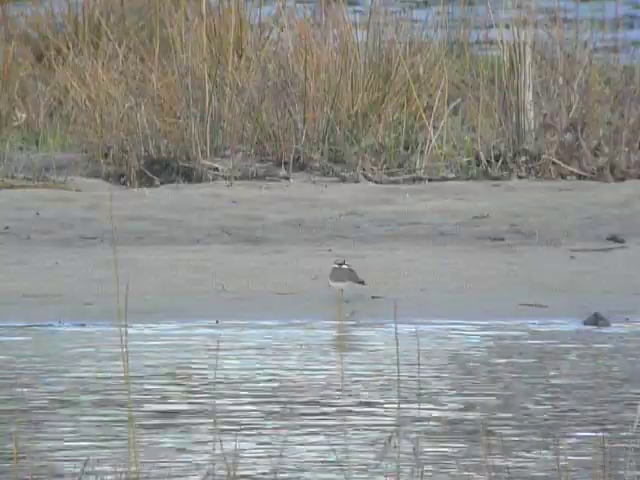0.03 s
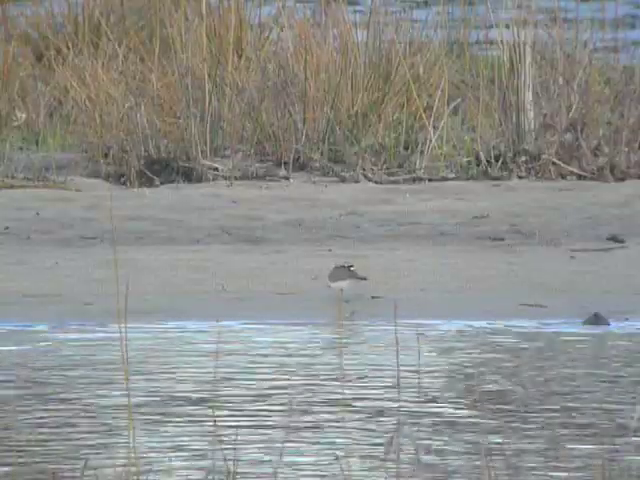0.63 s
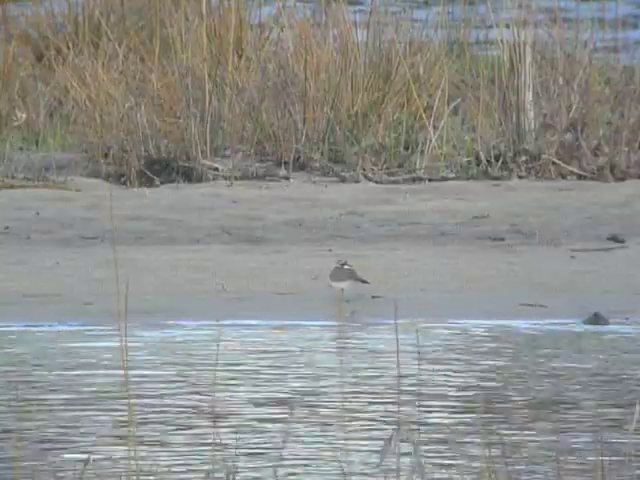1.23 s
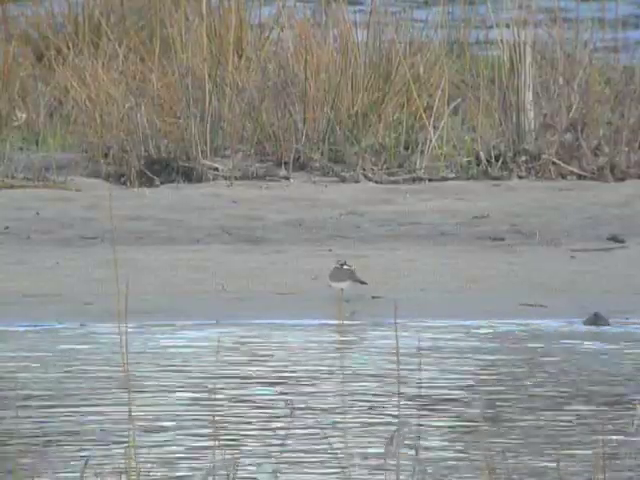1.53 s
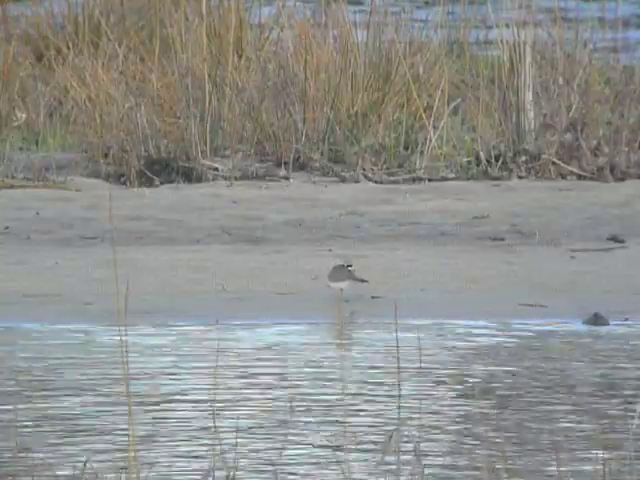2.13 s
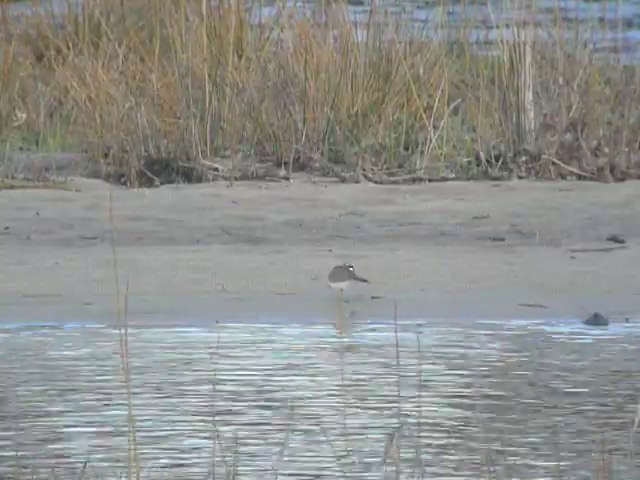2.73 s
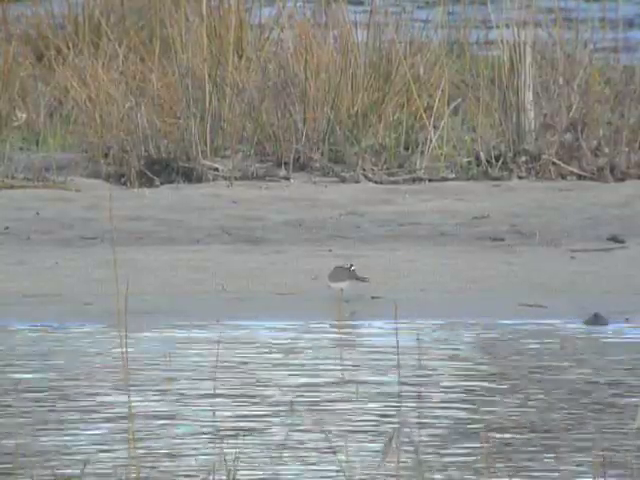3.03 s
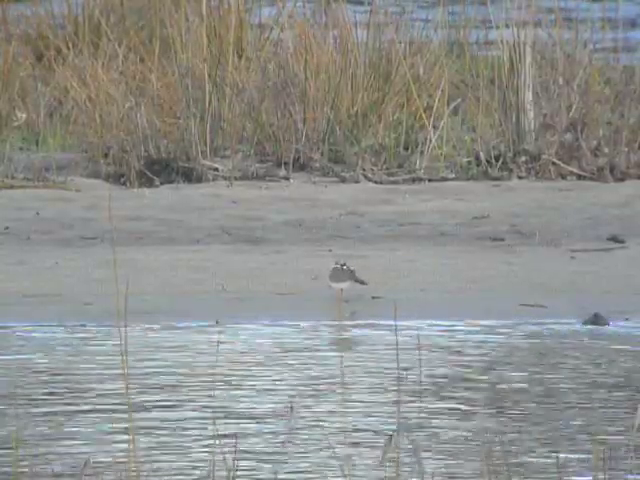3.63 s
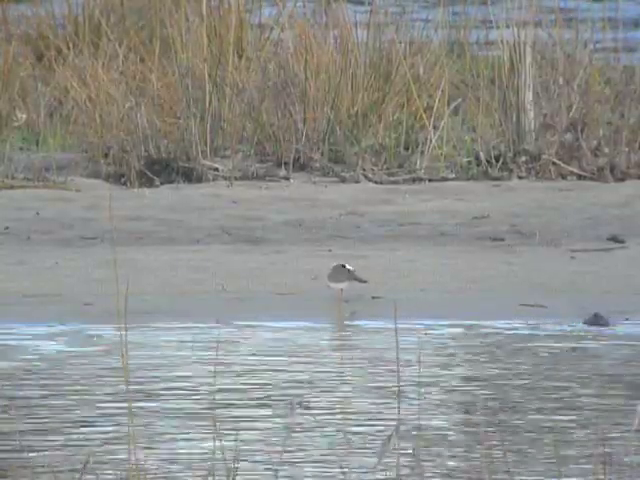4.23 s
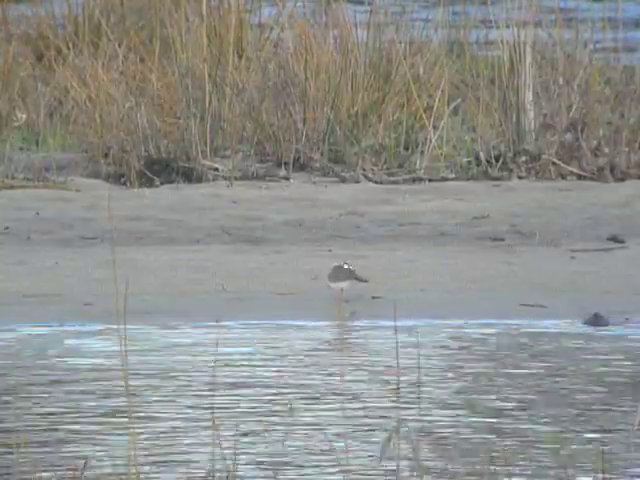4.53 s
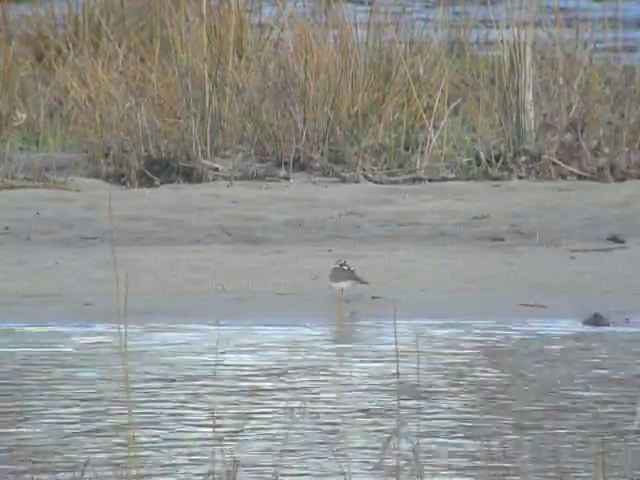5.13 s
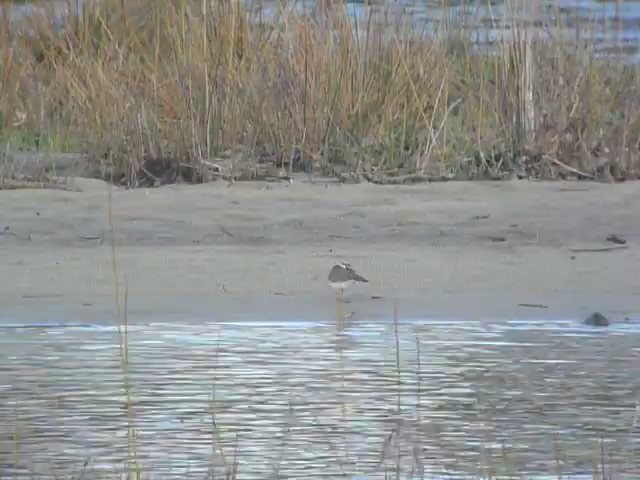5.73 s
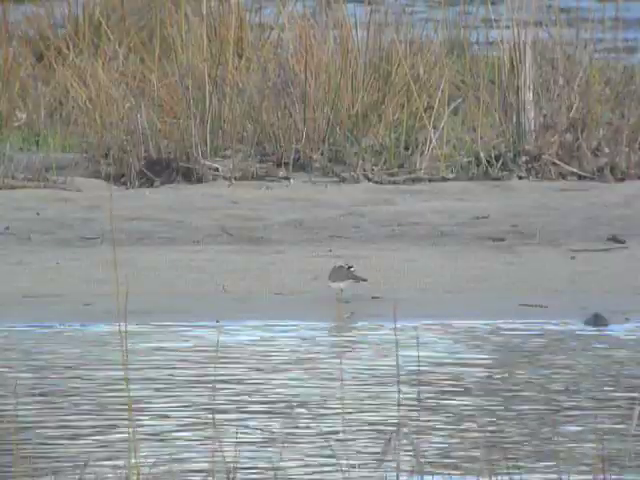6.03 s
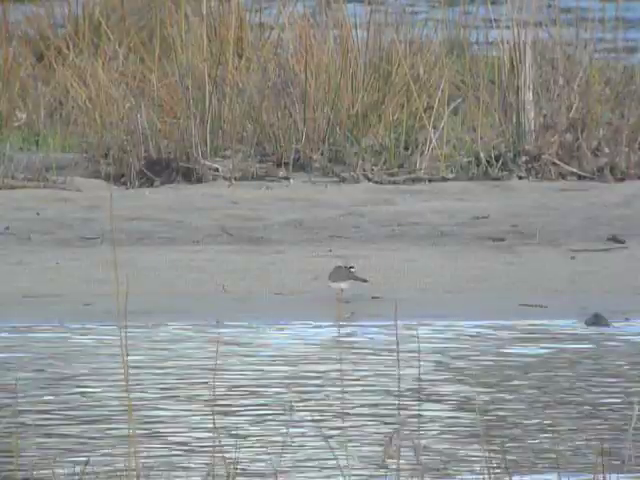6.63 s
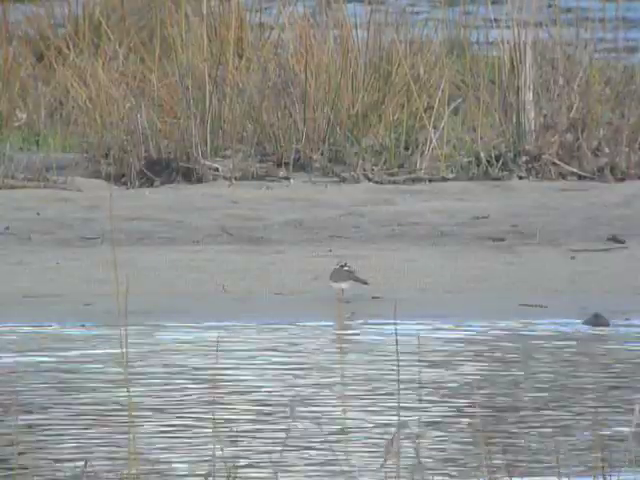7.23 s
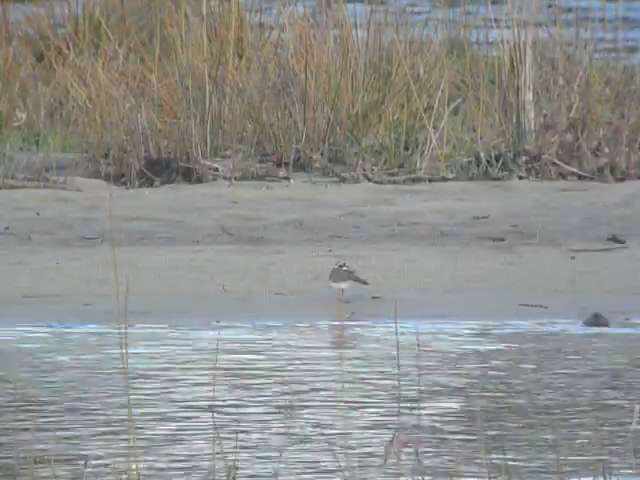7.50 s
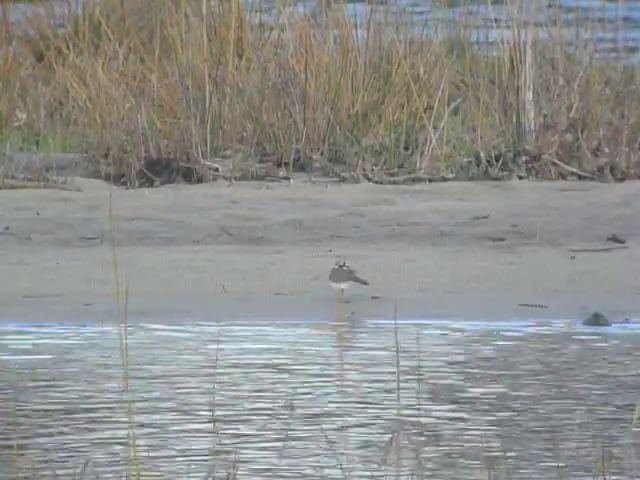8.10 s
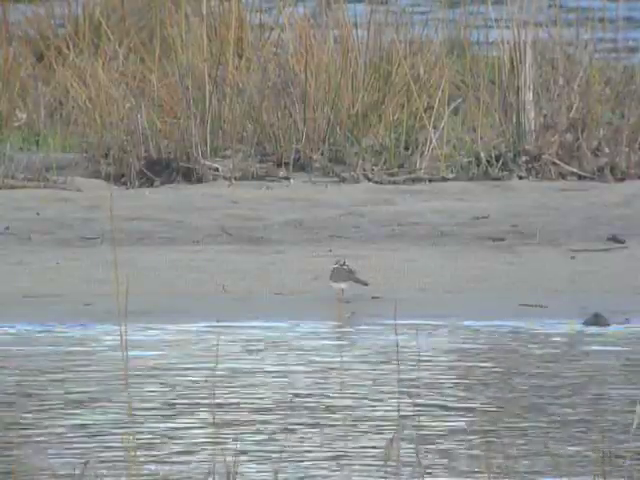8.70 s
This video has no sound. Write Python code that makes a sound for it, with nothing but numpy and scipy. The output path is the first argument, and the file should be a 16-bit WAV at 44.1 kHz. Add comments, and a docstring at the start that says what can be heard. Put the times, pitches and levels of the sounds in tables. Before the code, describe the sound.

A low outdoor rumble and the soft tyre roar of a distant road run for the whole nine seconds, swelling slightly as vehicles pass, with a faint microphone hiss. Close up, a light breeze thumps on the microphone, thickly for the first two seconds, then sparsely, with stronger bumps near 4, 7 and 7.7 seconds. One short, dull knock on the camera comes at about 0.9 seconds. Faint, distant songbirds whistle a held note with an upward slur at about 1, 5 and 6 seconds, with single whistles scattered between. Blurred twittering and quick runs of falling chips come from the reeds at around 3.2 to 4.3 seconds and again from 6 to 7.5. A faint, far engine hum holds its pitch until about 4 seconds, then sinks steadily lower to the end.

```python
"""Marshy riverbank in a light breeze

Tyres roar on a far road, where one engine holds its speed and then runs down. Distant songbirds
whistle slurred phrases, give short chips and twitter in the reeds. Up close, eddies of the breeze
thump on a narrow-band camera microphone, and the camera body takes one dull knock."""
import sys
import numpy as np
from scipy import signal
from scipy.fft import rfft, irfft
from scipy.io import wavfile
from scipy.ndimage import uniform_filter1d

SR = 44100
rng = np.random.default_rng(int(sys.argv[2]) if len(sys.argv) > 2 else 0)


def store_wav(level_fs):
    """Save 16-bit WAV to argv[1]."""
    pcm = np.round(np.clip(np.atleast_2d(level_fs), -1, 1) * 32767)
    wavfile.write(sys.argv[1], SR, pcm.T.astype(np.int16))


N = 386316
TIME = np.arange(N) / SR

# Tone colours of the open-air rumble and of the road's tyre roar, low body and hiss.
# Each row: frequency in Hz, relative spectral level in dB.
RUMBLE_SPECTRUM = [(20, -16.5), (40, -5), (65, 0.5), (100, -2), (160, -0.5), (250, -5.5), (340, -11.5),
                   (500, -11.5), (900, -41)]
ROAR_SPECTRUM = [(250, -13.5), (450, -17), (700, -9.5), (850, -4.5), (980, 0.5), (1070, 0), (1170, -3),
                 (1280, -2.5), (1450, -6.5), (1800, -8.5), (2100, -16.5), (2600, -30), (3500, -44.5)]
BODY_SPECTRUM = [(300, -20), (450, -11), (600, -2.5), (750, -0.5), (920, 0), (1300, -22)]
HISS_SPECTRUM = [(1300, -20.5), (1700, 2), (2050, 3.5), (2350, -1.5), (2650, -4), (3050, -5), (3400, -12),
                 (3800, -21.5), (4400, -33)]
# The rumble eases in the lull of the breeze. Each row: time in seconds, level in dB.
RUMBLE_FADER = [(0, -42.5), (1, -43.5), (3.2, -44.5), (5, -44.5), (6.5, -45), (8.76, -44.5)]
# Vehicles that stand out as they pass. Each row: time when nearest in seconds, seconds from there
# to half power, then the levels of roar, body and hiss in dB.
PASS_BYS = [(0.703, 0.46, -45.5, -50, -55), (2.212, 0.19, -40.5, -41.5, -59),
            (3.95, 0.92, -42.5, -56.5, -47.5), (7.396, 0.43, -63, -58, -48.5),
            (8.649, 0.38, -43, -44.5, -50)]
# The far engine's run. Each row: time in seconds, firing rate in Hz, level in dB.
ENGINE_RUN = [(0, 118, -56), (1.4, 118, -53), (1.9, 118, -46), (3, 127.5, -46), (3.9, 118, -49),
              (4.7, 93, -54), (5.5, 85, -56), (6.5, 72, -46.5), (8, 63.5, -47.5), (8.76, 57, -51)]
# Blurred twitter deep in the reeds. Each row: start in seconds, length in seconds, centre pitch in Hz,
# pitch spread as a share of the centre, relative level in dB.
TWITTER_SWELLS = [(0.12, 0.39, 3670, .06, -61.5), (3.197, 0.83, 3380, 0.082, -54.5),
                  (3.251, 1.1, 2120, 0.13, -42.5), (6.048, 0.73, 3560, 0.072, -57),
                  (6.251, .9, 2203, .09, -44.5), (7.151, 0.4, 2596, .14, -47)]
# Runs of falling chips. Each row: start in seconds, number of chips, spacing in seconds,
# each chip's starting pitch in Hz, relative level near the end of the run in dB.
CHIP_RUNS = [(3.39, 4, 0.084, 3730, -47), (5.997, 6, 0.1, 4120, -49.5), (6.68, 2, .22, 4320, -48.5)]
# One bird's phrase, a held note and then an upward slur. Each row: start in seconds,
# the held note's lowest pitch in Hz, relative levels of the held note and of the slur in dB.
SONG_PHRASES = [(.85, 2130, -45.5, -41), (5.04, 2185, -45, -40), (5.905, 2086, -43, -41.5)]
# Single whistles between the phrases. Each row: start in seconds, length in seconds,
# start, middle and end pitch in Hz, relative level in dB.
LONE_WHISTLES = [(0.267, 0.11, 2550, 2300, 2140, -46), (1.522, .05, 2800, 3060, 3800, -47),
                 (3.29, 0.14, 2820, 2860, 2790, -55), (4.875, 0.16, 2310, 2340, 2360, -48.5),
                 (5.55, 0.083, 2750, 2710, 2660, -52), (5.70, .11, 2117, 2210, 2080, -43.5)]
# Gusts that shed weaker eddies. Each row: start in seconds, length in seconds, typical strength in dB.
SOFT_GUSTS = [(0.201, 0.21, -25.5), (.58, 0.21, -28), (1.268, .07, -23), (1.94, 0.066, -26.5),
              (3.971, .1, -26.5), (6.35, 0.11, -31), (7.04, 0.059, -30)]
# Strong eddies striking the microphone. Each row: time in seconds, strength in dB, pitch in Hz.
STRONG_EDDIES = [(0.17, -14.5, 160), (.281, -24.5, 150), (0.619, -24, 120), (0.714, -16, 121),
                 (0.875, -23.5, 85), (0.996, -21, 115), (1.108, -19, 167), (1.248, -18, 154),
                 (1.700, -20.5, 139), (2.055, -19, 142), (2.095, -21.5, 105), (3.236, -29.5, 105),
                 (4.105, -20.5, 123), (4.229, -25, 160), (4.734, -30, 114), (5.647, -27.5, 134),
                 (6.15, -31.5, 160), (6.914, -19.5, 152), (6.976, -27.5, 130), (7.698, -16.5, 124),
                 (7.718, -19, 150)]


def undb(db):
    """Decibels to gain."""
    return 10 ** (np.asarray(db) / 20)


def unit(x):
    """Scale to rms 1."""
    return x / np.sqrt(np.mean(x ** 2))


def curves(table):
    """One automation curve for each column after the table's time column."""
    times, *columns = np.transpose(table)
    return [np.interp(TIME, times, column) for column in columns]


def add(out, start, x):
    """Mix x into out from the given time on."""
    i = max(int(start * SR), 0)
    out[i:i + len(x)] += x[:N - i]


def butter(x, hz, kind, order):
    """Causal low-pass or high-pass."""
    return signal.sosfilt(signal.butter(order, hz, kind, fs=SR, output="sos"), x)


def noise(spectrum):
    """Noise of rms 1, coloured by a spectrum table."""
    hz, db = np.transpose(spectrum)
    bins_hz = np.arange(N // 2 + 1) * SR / N + 1e-3
    gain = undb(np.interp(np.log(bins_hz), np.log(hz), db, left=-np.inf, right=-np.inf))
    return unit(irfft(rfft(rng.standard_normal(N)) * gain, N))


def drift(rate_hz):
    """Smooth random modulation of rms 1, taking rate_hz new values a second."""
    hold = int(SR / rate_hz)
    steps = np.repeat(rng.standard_normal(N // hold + 1), hold)
    return unit(uniform_filter1d(uniform_filter1d(steps, hold), hold)[:N])


def outdoors(x, t60, wet_db):
    """Reeds and banks scatter a short diffuse tail after the direct sound."""
    tail = rng.standard_normal(SR) * np.exp(-np.log(1000) * TIME[:SR] / t60)
    return x + undb(wet_db) * signal.fftconvolve(x, tail / np.linalg.norm(tail))[:N]


def open_air():
    """A low, gently wavering bed of outdoor rumble."""
    return noise(RUMBLE_SPECTRUM) * undb(curves(RUMBLE_FADER)[0] + 1.1 * drift(6.6))


def traffic_levels(roar_db=-39, body_db=-52, hiss_db=-48.5):
    """Three dB curves: over steady traffic, each vehicle adds power by inverse square of distance."""
    power = undb([[roar_db], [body_db], [hiss_db]]) ** 2
    for nearest_s, half_power_s, *db in PASS_BYS:
        distance_squared = 1 + ((TIME - nearest_s) / half_power_s) ** 2
        power = power + undb(db)[:, None] ** 2 / distance_squared
    return 10 * np.log10(power)


def road():
    """Tyre roar with a low body and a hiss; moving air makes each waver on its long way."""
    roar_db, body_db, hiss_db = traffic_levels()
    roar = noise(ROAR_SPECTRUM) * undb(roar_db + 0.33 * drift(7.5))
    body = noise(BODY_SPECTRUM) * undb(body_db + .5 * drift(5.3))
    hiss = noise(HISS_SPECTRUM) * undb(hiss_db + .5 * drift(12))
    return roar + body + hiss


def engine():
    """Only the firing tone and a weak octave carry this far; both swell and fade."""
    firing_hz, db = curves(ENGINE_RUN)
    phase = 2 * np.pi * np.cumsum(firing_hz * (1 + 0.0057 * drift(12))) / SR
    firing = np.sin(phase) * undb(1.5 * drift(6.9))
    octave = np.sin(2 * phase) * undb(-13.5 + 3.9 * drift(4.8))
    return np.sqrt(2) * undb(db) * (firing + octave)


def bird_note(length_s, pitches, waver):
    """A tone that bends through three pitches; more waver makes it huskier."""
    progress = np.linspace(0, 1, int(length_s * SR))
    hz = np.polyval(np.polyfit([0, .5, 1], pitches, 2), progress)
    tremble = unit(uniform_filter1d(rng.standard_normal(len(progress)), size=120))
    envelope = np.sqrt(2 * np.abs(np.sin(np.pi * progress)))
    return envelope * np.sin(2 * np.pi * np.cumsum(hz * (1 + waver * tremble)) / SR)


def twitter(note_s=.04, notes_per_swell=60):
    """Tiny far notes overlap into swells, loudest mid-way; the microphone dulls the highest."""
    out = np.zeros(N)
    for start, length, hz, spread, db in TWITTER_SWELLS:
        for place, height, bend in rng.uniform(-1, 1, size=(notes_per_swell, 3)):
            pitches = hz * (1 + spread * (height + bend * np.array([-.5, 0, .5])))
            gain = undb(db - 8.5) * np.sqrt(1 - place ** 2)
            add(out, start + length * (1 + place) / 2, gain * bird_note(note_s, pitches, waver=.03))
    return butter(out, 3550, "low", order=6)


def chips(chip_s=0.048, fall=0.26, rise_db=1.5):
    """Hoarse falling chips, each louder than the one before; the microphone dulls their top."""
    out = np.zeros(N)
    for start, count, spacing, hz, end_db in CHIP_RUNS:
        pitches = hz * (1 - fall * np.array([0, .5, 1]))
        for k in range(round(count)):
            gain = undb(end_db - rise_db * (round(count) - 1.5 - k))
            add(out, start + k * spacing, gain * bird_note(chip_s, pitches, waver=0.068))
    return butter(out, 3170, "low", order=6)


def phrase_notes(held_s=.18, sag=.04, slur_after_s=.243, slur_s=.07, from_hz=2340, to_hz=2955):
    """Each phrase's sagging held note and upward slur, as rows like those of LONE_WHISTLES."""
    rows = []
    for start, hz, held_db, slur_db in SONG_PHRASES:
        edge_hz = hz * (1 + sag)
        rows.append((start, held_s, edge_hz, hz, edge_hz, held_db))
        rows.append((start + slur_after_s, slur_s, from_hz, np.sqrt(from_hz * to_hz), to_hz, slur_db))
    return rows


def whistles():
    """Held notes ring clear; wide slurs turn husky and fade as they slide."""
    out = np.zeros(N)
    for start, length, start_hz, middle_hz, end_hz, db in phrase_notes() + LONE_WHISTLES:
        slur_width = abs(np.log(end_hz / start_hz))
        tone = bird_note(length, [start_hz, middle_hz, end_hz], waver=0.0055 + 0.11 * slur_width)
        fade_db = 27 * slur_width * np.linspace(0, 1, len(tone))
        add(out, start, tone * undb(db - fade_db))
    return out


def birds():
    """Songbirds at two depths: whistles and chips in front, a wetter twitter behind."""
    front = outdoors(undb(-2.5) * whistles() + chips(), t60=0.57, wet_db=-8.5)
    return front + outdoors(twitter(), t60=0.51, wet_db=-2.5)


def gust_eddies(eddies_per_s=13, centre_hz=118, spread_octaves=.3, spread_db=1.5):
    """Weak eddies scattered at random through each gust, as rows like those of STRONG_EDDIES."""
    rows = []
    for start, length, db in SOFT_GUSTS:
        count = max(round(length * eddies_per_s), 1)
        for k, (place, size, pitch) in enumerate(rng.uniform(-1, 1, size=(count, 3))):
            hit_s = start + length * (k + (1 + place) / 2) / count
            rows.append((hit_s, db + spread_db * size, centre_hz * 2 ** (spread_octaves * pitch)))
    return rows


def breeze(churn_s=0.02, churn_hz=190, bass_cut_hz=56):
    """Each eddy is a pressure bump inside a brief churn; the microphone's bass cut swings it back."""
    thumps, churn_power = np.zeros((2, N))
    t = TIME[:SR // 5] - .1  # seconds from the eddy's centre
    churn = butter(rng.standard_normal(N), churn_hz, "low", order=4)
    churn = unit(butter(churn, bass_cut_hz, "high", order=2))
    for hit_s, db, hz in STRONG_EDDIES + gust_eddies():
        bump = np.exp(-(4.33 * hz * t) ** 2)
        thump = butter(bump, bass_cut_hz, "high", order=2)
        add(thumps, hit_s + t[0], undb(db) * thump / np.abs(thump).max())
        churn_db = -20.5 + 0.56 * db  # stronger eddies churn more
        add(churn_power, hit_s + t[0], undb(churn_db) ** 2 * np.exp(-2 * np.abs(t) / churn_s))
    return butter(thumps, 33, "high", order=1) + churn * np.sqrt(churn_power)


def knock(hit_s=.8612, gain_db=-11.0, hz=245):
    """One short dull knock on the camera body: a single push and pull."""
    phase = 2 * np.pi * hz * (TIME - hit_s)
    push_pull = 3 * phase / (1 + phase ** 2) ** 2
    return undb(gain_db) * butter(push_pull, 630, "low", order=3)


def scene():
    """The mono mix: road, air and engine far off, wind and knock up close, birds in the distance."""
    return (road() + open_air() + engine() + breeze() + knock() + birds())[None]


def record(dry, whine_hz=4389, top_hz=8300):
    """The camera adds its own hiss and a thin electrical whine, and cuts the top."""
    hiss = undb(-62.0) * butter(rng.standard_normal(N), 7710, "low", order=12)
    whine = undb(-77.5) * np.sin(2 * np.pi * whine_hz * TIME)
    top_cut = signal.ellip(8, .2, 70, top_hz, fs=SR, output="sos")
    return signal.sosfilt(top_cut, dry + hiss + whine)


dry = scene()
out = record(dry)
store_wav(out)
```